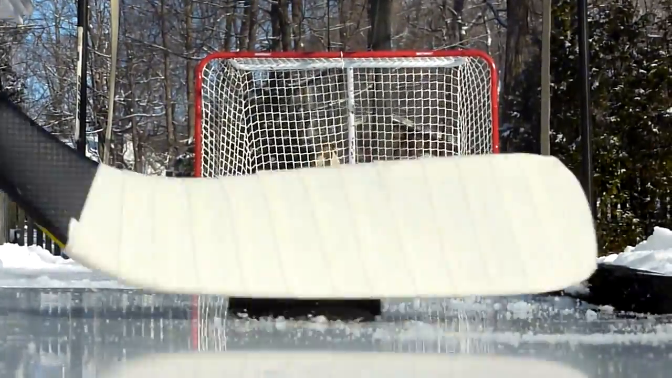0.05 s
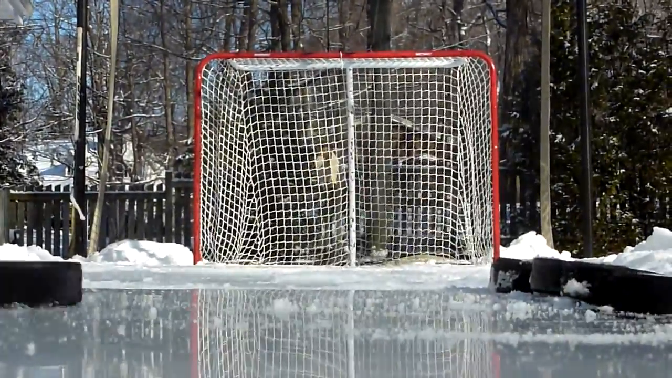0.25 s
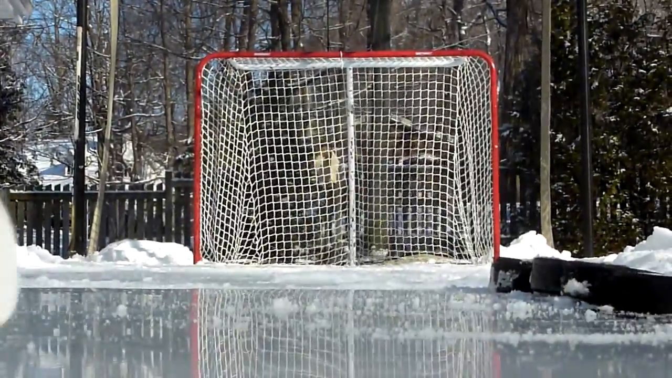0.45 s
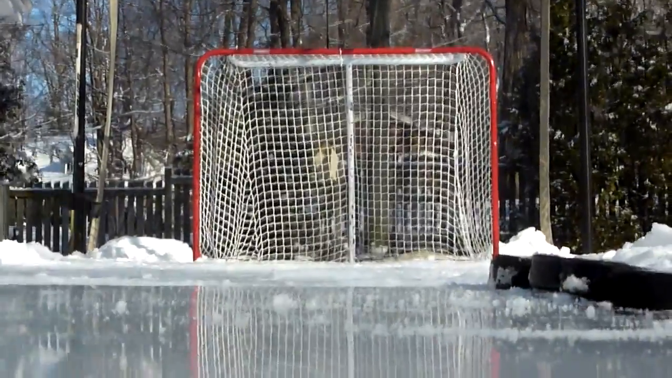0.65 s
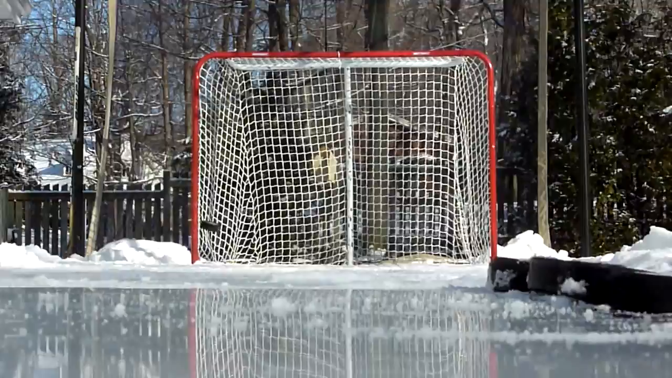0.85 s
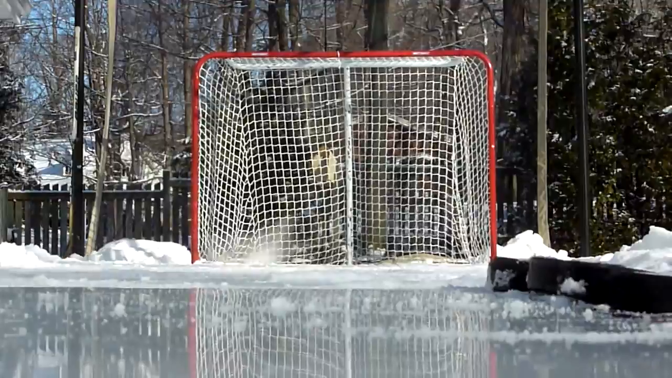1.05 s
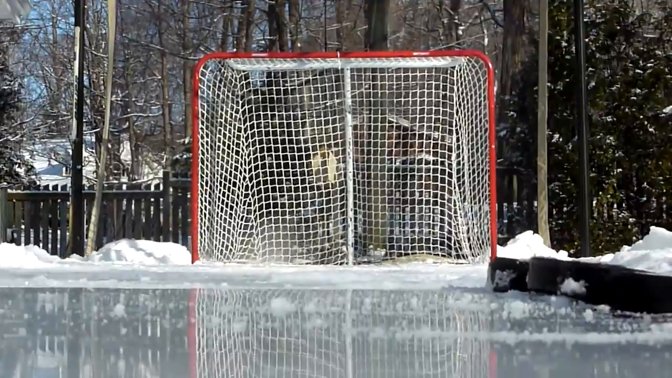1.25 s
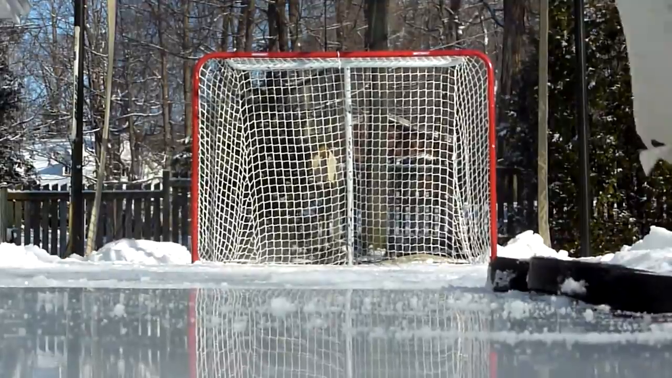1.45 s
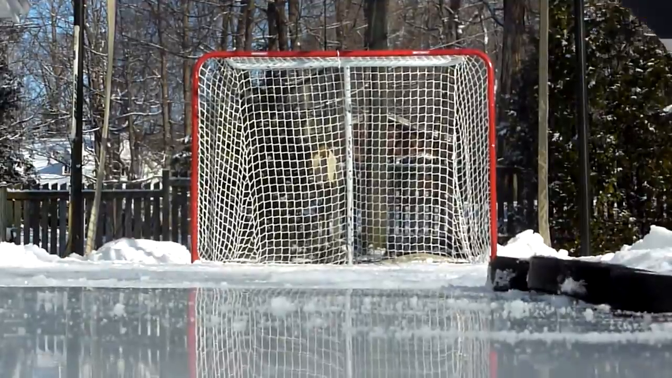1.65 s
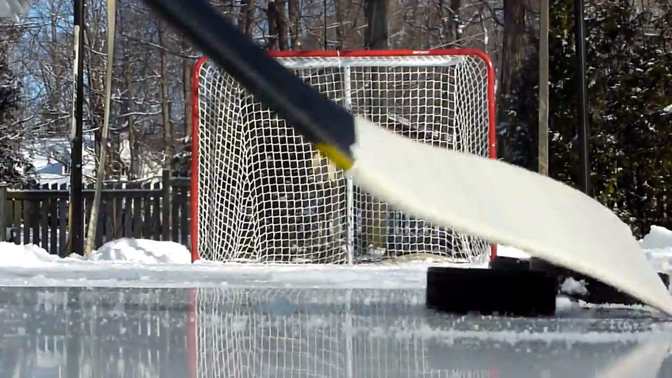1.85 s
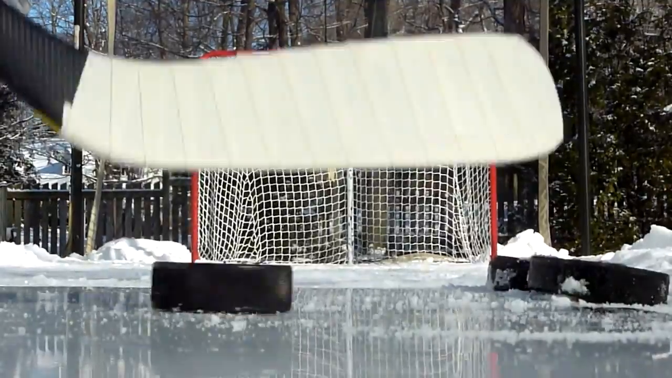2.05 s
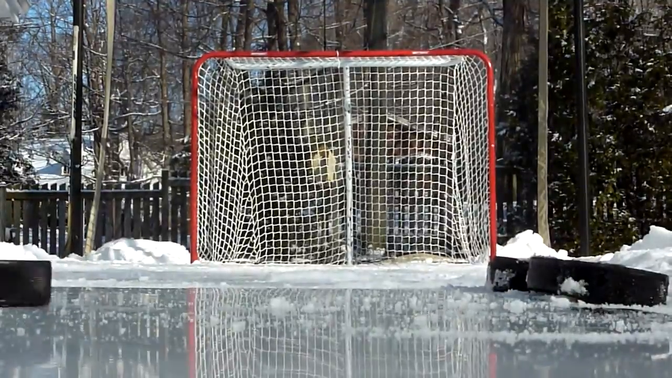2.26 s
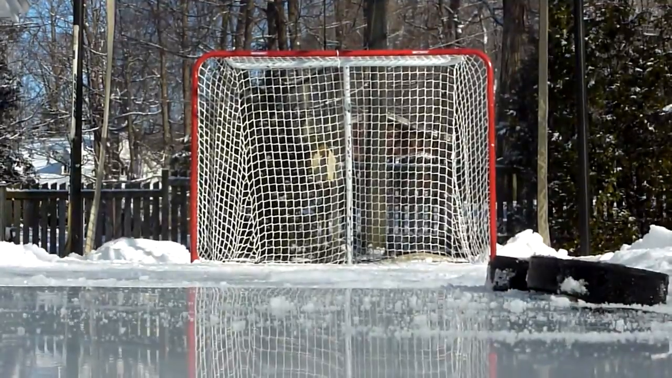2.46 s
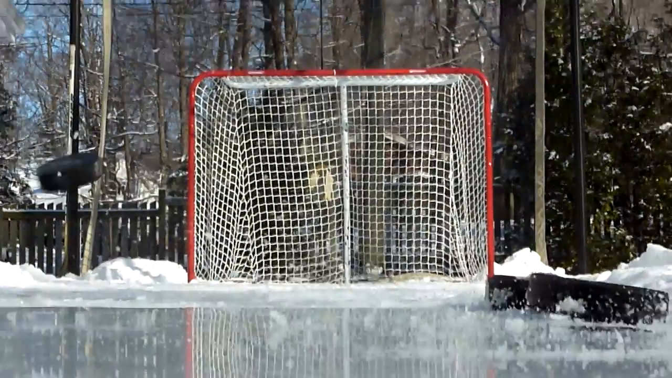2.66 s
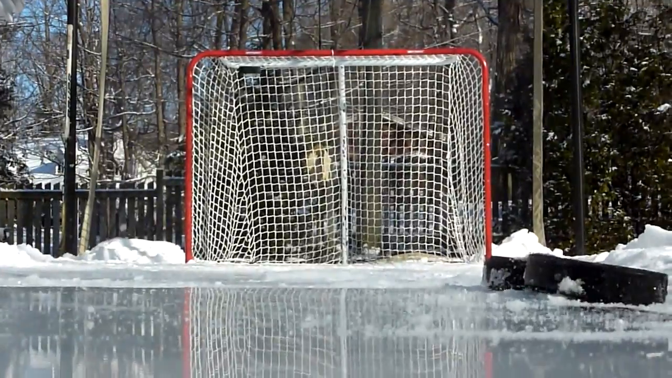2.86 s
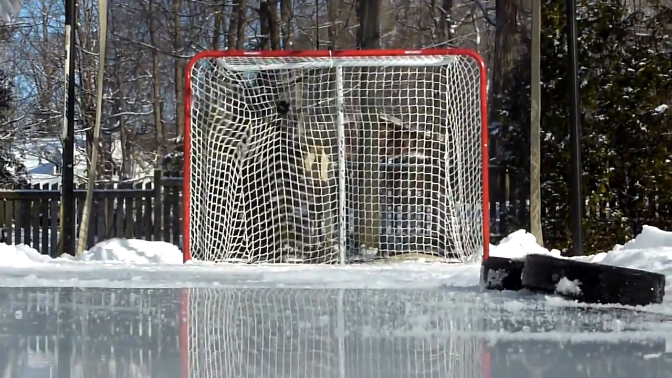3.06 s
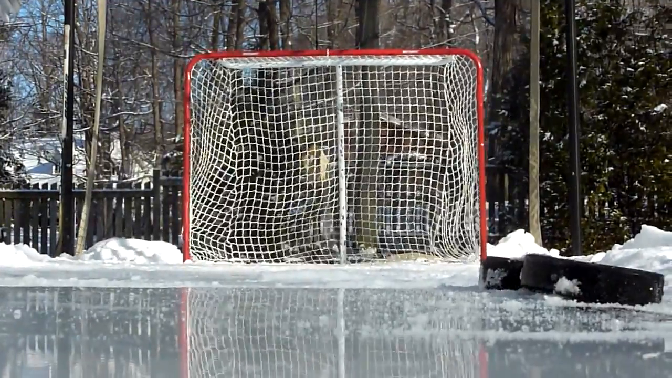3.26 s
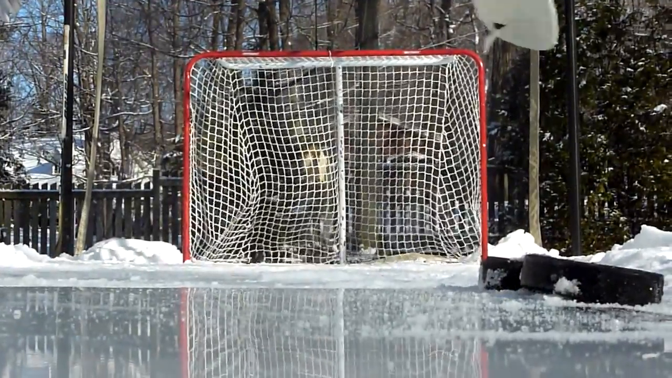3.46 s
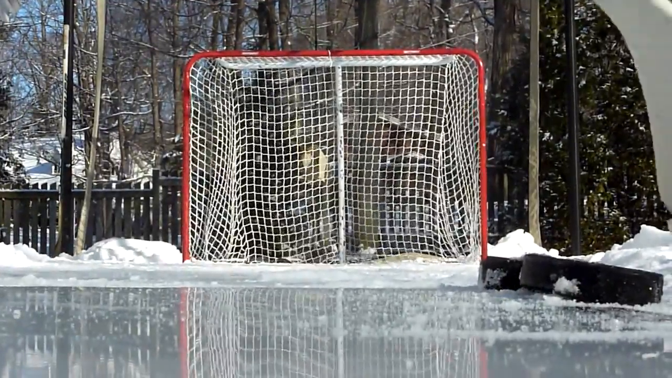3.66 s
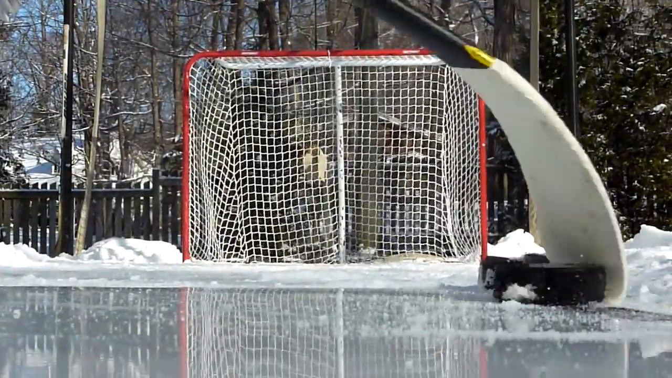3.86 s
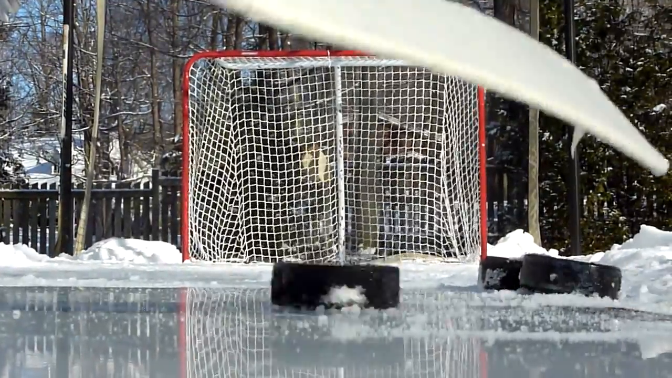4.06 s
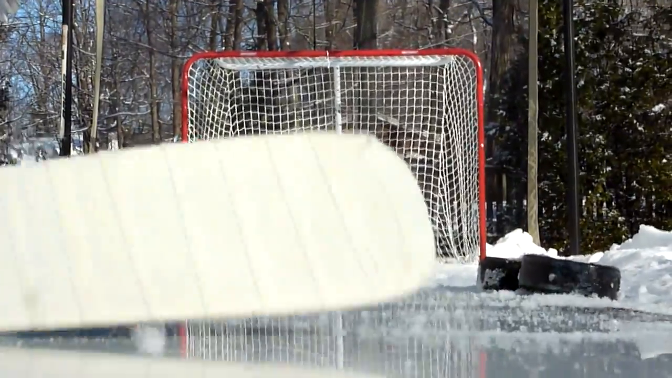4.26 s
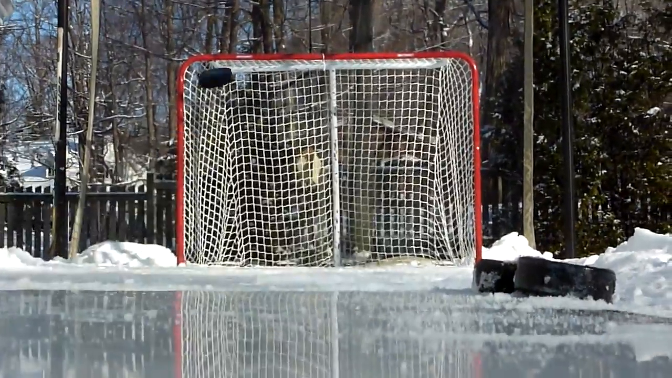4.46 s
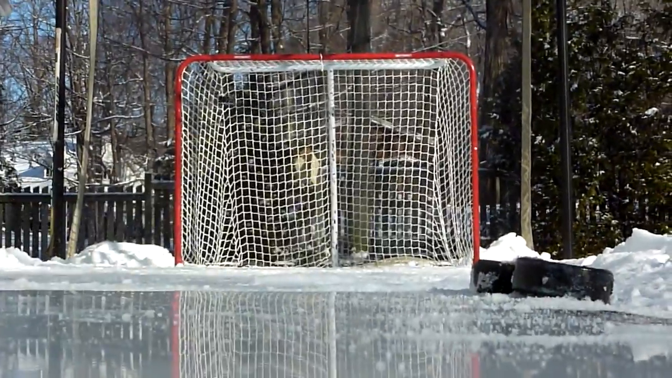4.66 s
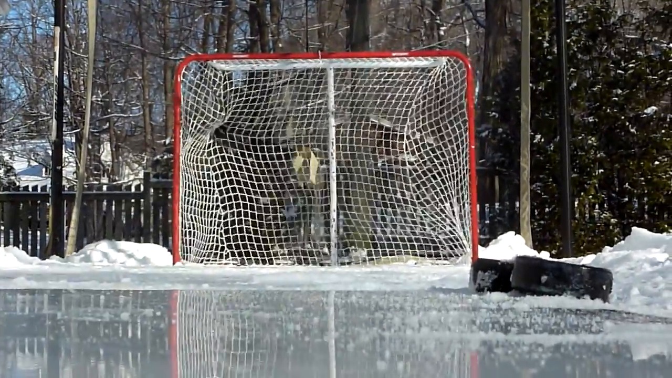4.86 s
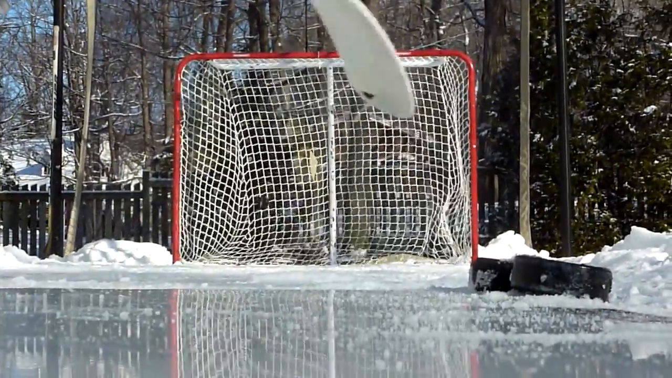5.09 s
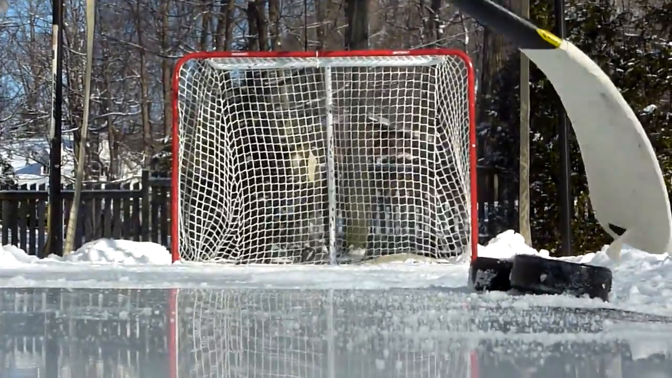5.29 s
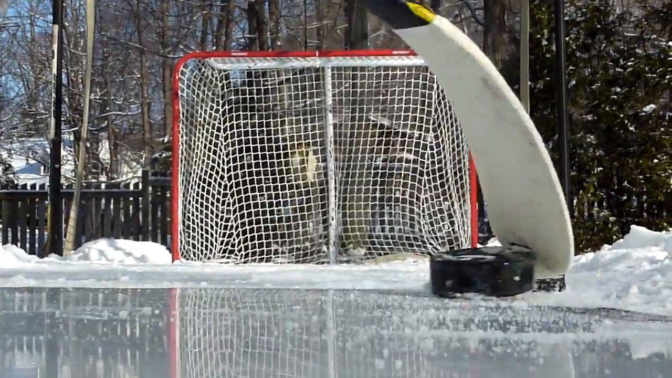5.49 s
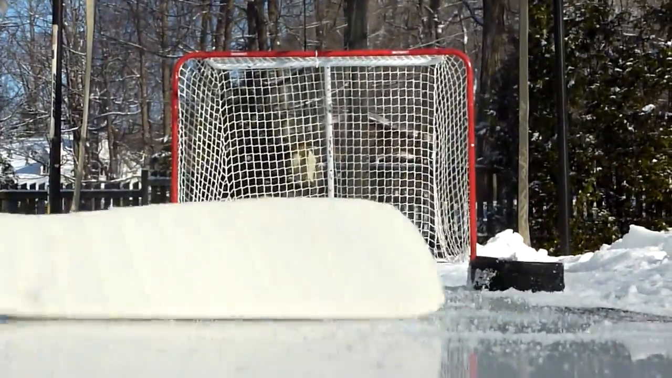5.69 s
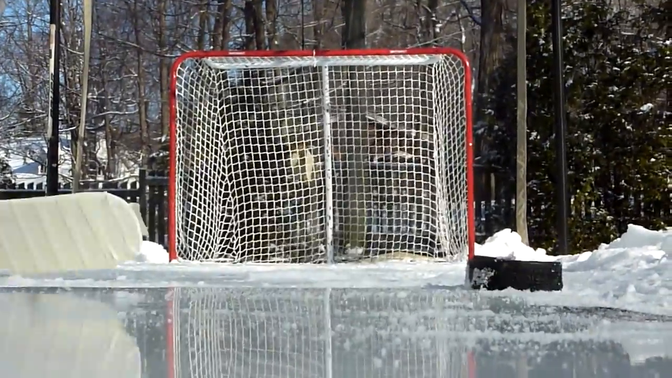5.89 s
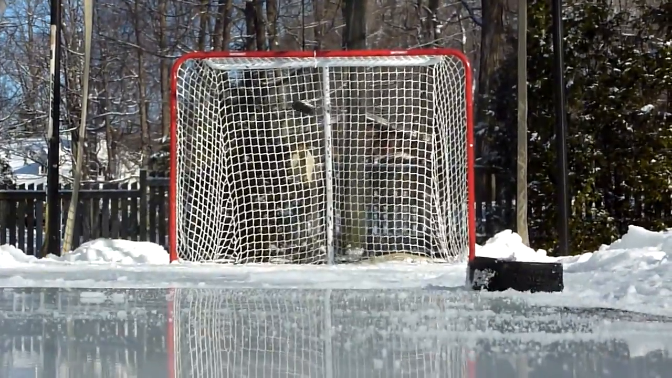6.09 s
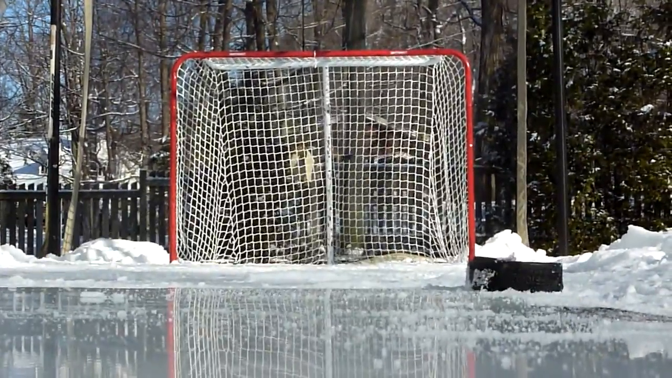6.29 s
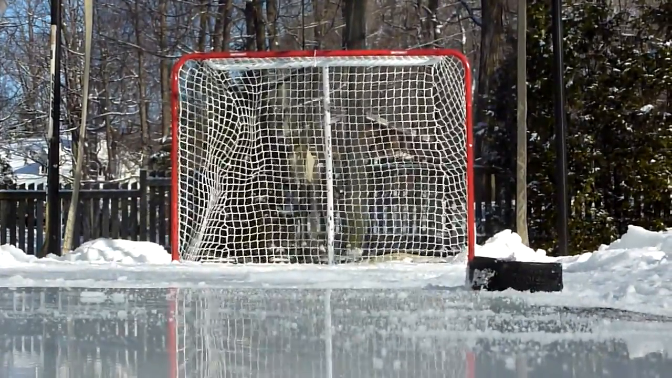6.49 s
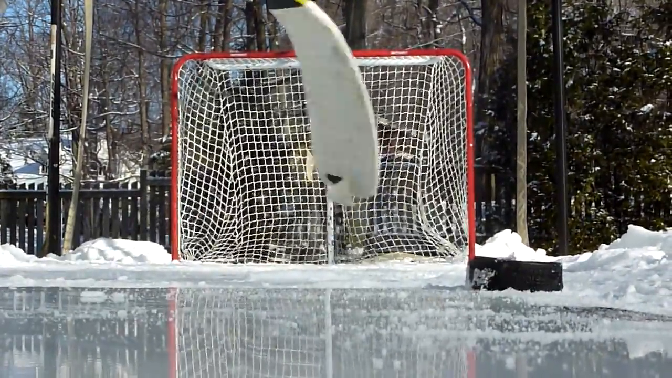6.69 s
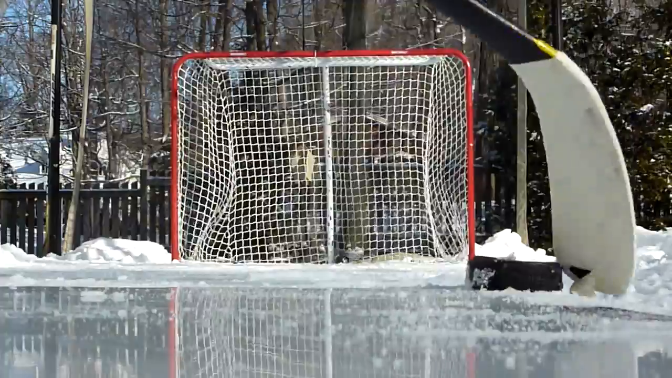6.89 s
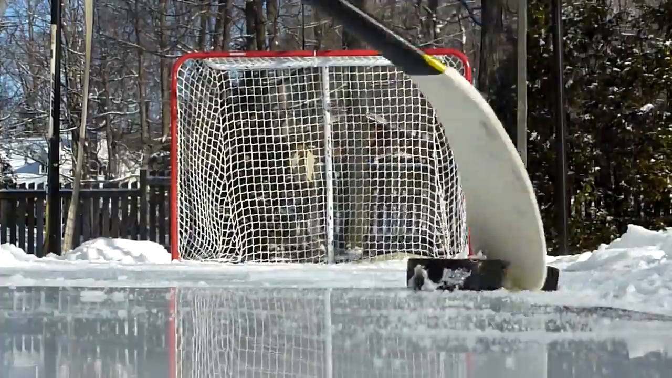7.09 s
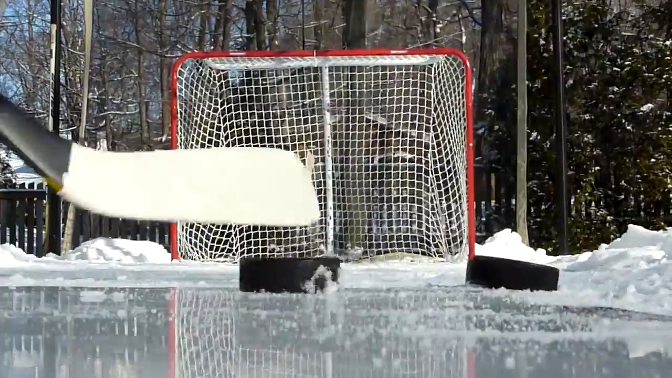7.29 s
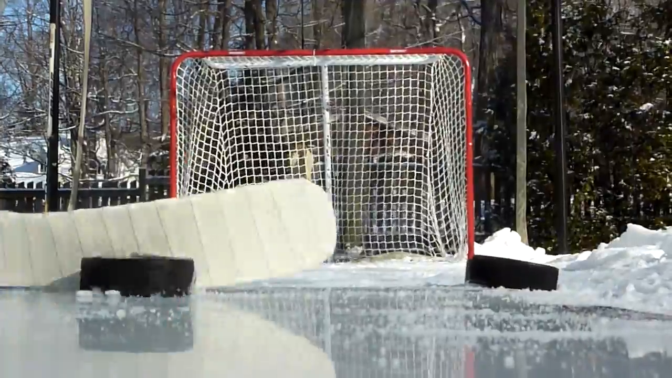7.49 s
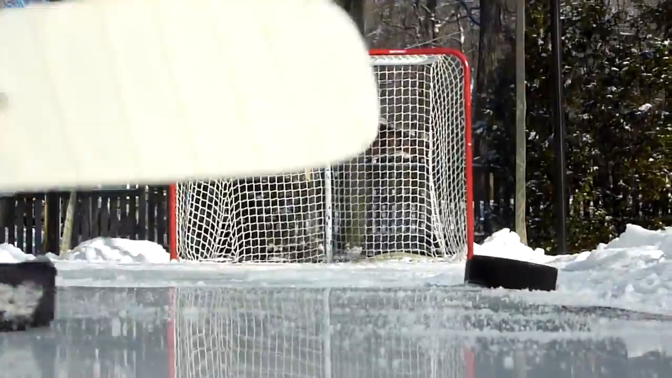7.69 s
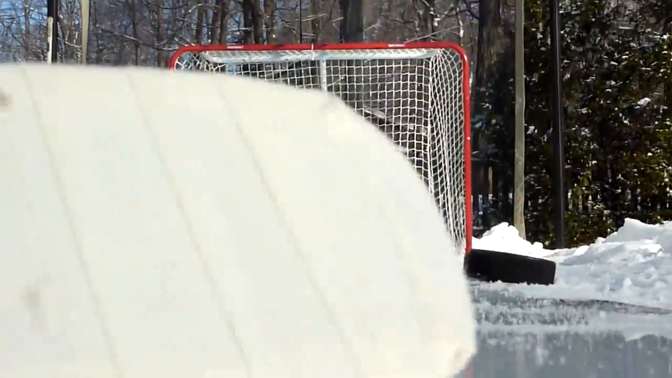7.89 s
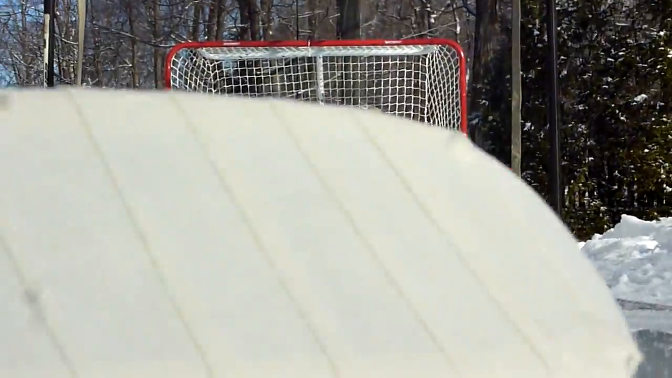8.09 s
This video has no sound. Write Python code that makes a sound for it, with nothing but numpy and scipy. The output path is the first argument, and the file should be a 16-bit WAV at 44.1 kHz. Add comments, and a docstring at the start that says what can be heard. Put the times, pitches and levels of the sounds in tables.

```python
"""An outdoor rink: a hockey stick drags pucks over the ice and shoots them at a net, heard from on the ice.
Far off a small engine idles as a row of harmonics in the hush of the yard, which is coloured noise.
Sliding blade and pucks hiss and rumble as noise; short rasps scuff and thin rings follow at the goal.
Each blow is a thump, ringing blade modes, a struck and rattling ice sheet and a burst of crack noise.
The steady sounds dip at listed moments and creep back."""
import sys
import numpy as np
from scipy import signal
from scipy.fft import rfft, irfft, next_fast_len
from scipy.io import wavfile
from scipy.ndimage import uniform_filter1d

SR = 44100
rng = np.random.default_rng(int(sys.argv[2]) if len(sys.argv) > 2 else 0)


def dump_mix(stems):
    """Bounce the given channels to the path in sys.argv[1] as a 16-bit WAV at rate SR."""
    frames = np.atleast_2d(stems).T  # one column per channel
    limited = np.clip(frames, -1, 1)  # hard clip at full scale
    pcm = np.round(limited * 32767).astype(np.int16)
    wavfile.write(sys.argv[1], SR, pcm)


N = 358974
T = np.arange(N) / SR  # time [s]

# colour of blade and puck scraping on ice: (frequency [Hz], relative density [dB per Hz])
SCRAPE = [(530, -30), (900, 1.5), (1850, -2), (2830, -7.5), (3190, -5), (3470, -5), (4520, -6), (5890, -7),
          (7490, -9), (8050, -11.5), (12700, -5.5), (15100, -20), (16000, -10.5)]
# modes of the blade ringing free: (frequency [Hz], relative level [dB], t60 [s])
BLADE = [(713, -4.5, 0.014), (953, -5, 0.01), (1295, -6, .011), (1626, -5.5, .009), (2086, -6, 0.01),
         (2697, -10.5, 0.0098), (3880, -11.5, 0.0098)]
HUSH_DIP_SHARE = 0.62  # hiss, rumble and yard dip less than the engine
CHATTER_TOP_HZ = 2300


def undb(db):
    """Decibels to amplitude."""
    return np.exp(np.asarray(db) * np.log(10) / 20)


def unit(x):
    """Scale to rms 1."""
    return x / np.sqrt(np.mean(x ** 2))


def fade(t, t60):
    """Exponential decay that loses 60 dB in t60 seconds."""
    return np.exp(-np.log(1000) * t / t60)


def lowpass(x, hz, order=2):
    """Butterworth low-pass."""
    return signal.sosfilt(signal.butter(order, hz, fs=SR, output="sos"), x)


def highpass(x, hz):
    """Second-order Butterworth high-pass."""
    return signal.sosfilt(signal.butter(2, hz, "high", fs=SR, output="sos"), x)


def resonate(x, hz, q):
    """One resonant mode driven by x."""
    return signal.lfilter(*signal.iirpeak(hz, q, SR), x)


def colour(x, table):
    """Filter by (frequency [Hz], level [dB]) points joined on a log axis."""
    hz, db = np.transpose(table)
    size = next_fast_len(N)
    f = np.arange(size // 2 + 1) * SR / size + 1
    gain = undb(np.interp(np.log(f), np.log(hz), db))
    return irfft(rfft(x, size) * gain, size)[..., :N]


def wide(x, table, alike):
    """Stereo noise of one colour, mid rms 1; a share of the side is the mid a quarter turn late, the rest unrelated."""
    # stereo width: (frequency [Hz], side minus mid [dB])
    side_width = [(60, -32), (110, -51), (200, -20), (380, -18), (700, -19), (1290, -8), (2380, -4),
                  (4400, -1.5), (8120, 0), (15000, 3)]
    mid, other = colour(x, table)
    late = np.imag(signal.hilbert(mid, next_fast_len(N)))[:N]
    late = highpass(late, 2500)  # only short waves turn
    side = colour(alike * late + np.sqrt(1 - alike ** 2) * other, side_width)
    return np.array([mid + side, mid - side]) / np.sqrt(np.mean(mid ** 2))


def walk(rate):
    """Random levels, rate per second, joined by straight glides; rms 1."""
    k = int(SR / rate)
    steps = np.repeat(rng.standard_normal(N // k + 1), k)
    return unit(uniform_filter1d(steps, k)[:N])


def dip_db():
    """Each dip sinks within a moment, comes most of the way back soon and creeps up the rest."""
    # dips of the steady sounds: (time [s], depth before recovery sets in [dB])
    dips = [(0.62, 31), (1.14, 10.5), (2.06, 11.5), (2.655, 41.5), (4.36, 37.5), (5.63, 4.5), (5.85, 7.5),
            (7.47, 9.5), (7.82, 16.5)]
    fall_s, back_s, creep_s, creep_share = 0.054, 0.14, 0.85, 0.15  # time constants
    out, coarse = 0, T[::64]
    for s, depth_db in dips:
        t = np.maximum(coarse - s, 0)
        back = (1 - creep_share) * np.exp(-t / back_s) + creep_share * np.exp(-t / creep_s)
        out = out - depth_db * (1 - np.exp(-t / fall_s)) * back
    return np.interp(T, coarse, out)


def hush():
    """Open air of the yard: coloured stereo noise whose level wavers and dips."""
    # colour of the yard: (frequency [Hz], relative density [dB per Hz])
    air = [(25, -15), (50, -15), (130, 8), (300, -8.5), (500, -4), (1000, -7), (2000, -14), (4000, -15.5),
           (8000, -21.5), (12000, -25.5), (16000, -33)]
    level_db = -40.5 + 0.61 * walk(6.3) + HUSH_DIP_SHARE * dip_db()
    return wide(rng.standard_normal((2, N)), air, 0.13) * undb(level_db)


def engine():
    """Harmonics of the firing rate on a slightly uneven crank pass the fixed exhaust colour."""
    # idling: (time [s], firing rate [Hz], level before dips [dB])
    idle = [(0.0, 26.7, -36), (0.32, 26.7, -33.5), (0.72, 27.93, -35.5), (1.09, 27.18, -34),
            (1.54, 27.6, -33.5), (2.2, 27.44, -32), (2.56, 27.5, -33.5), (3.02, 28.32, -33),
            (3.67, 27.57, -33), (3.97, 25.96, -29.5), (4.19, 26.66, -32.5), (4.49, 29.34, -35.5),
            (5.5, 29.07, -34.5), (5.73, 29.83, -33.5), (6.21, 29.4, -33.5), (7.25, 30.1, -33.5),
            (7.46, 29.52, -32), (8.14, 30.7, -36.5)]
    # exhaust colour: (frequency [Hz], relative level [dB])
    exhaust = [(28, -34), (55, -4.5), (82, -2.5), (88, -14), (109, 5), (150, 4), (165, 3.5), (180, -1),
               (200, -12.5), (220, -11), (250, -5.5), (275, -18.5), (300, -24), (360, -40)]
    s, rates, levels = np.transpose(idle)
    hz, level_db = np.interp(T, s, rates), np.interp(T, s, levels)
    turn = 2 * np.pi * np.cumsum(hz * (1 + 0.0039 * walk(25.2))) / SR
    pipe_hz, pipe_db = np.transpose(exhaust)
    hum = 0
    for k in range(1, 14):
        gain = undb(np.interp(k * hz, pipe_hz, pipe_db) + 1.8 * walk(4))
        hum = hum + gain * np.cos(k * turn + 0.042 * k * k)
    return unit(hum) * undb(level_db + dip_db())


def pings():
    """Thin rings as a puck reaches the goal: one narrow mode each, shaken by noise and fading."""
    # rings: (time [s], level at the start [dB], frequency [Hz], width [Hz], t60 [s])
    goal_rings = [(1.144, -27, 1950, 120, .12), (3.17, -43, 11800, 35, 0.33), (3.3, -50, 11800, 35, .28),
                  (5.011, -42, 11800, 35, 0.24), (6.7, -54, 11800, 35, 0.29)]
    out = np.zeros(N)
    for s, db, hz, width, t60 in goal_rings:
        at, t = int(s * SR), T[:int(t60 * SR)]
        ring = unit(resonate(rng.standard_normal(SR), hz, hz / width)[SR // 2:])
        out[at:at + len(t)] += undb(db) * fade(t, t60) * ring[:len(t)]
    return out


def ice(force):
    """The ice sheet answers a force with its broad modes, alternating in sign."""
    # modes of the sheet: (frequency [Hz], width [Hz], relative level [dB])
    sheet = [(258, 47.6, -4.5), (313.3, 24.3, 1), (344, 33, -1.5), (381, 39.4, -3.5), (445, 47, -4.5),
             (605, 90, -6.5), (690, 115, -7.5), (966, 310, -17), (1370, 340, -21)]
    out = 0
    for k, (hz, width, db) in enumerate(sheet):
        out = out + (-1) ** k * undb(db) * resonate(force, hz, hz / width)
    return out


def shaken(envelope):
    """A rough force of this envelope on the sheet; the low modes answer most and ring on."""
    soft = lowpass(rng.standard_normal(N), 1300)
    return ice(soft * envelope) / np.std(ice(soft))


def throbs():
    """The sheet rings low as blade and puck settle: tones that swell within a cycle or two and die away."""
    # low rings: (time [s], relative peak [dB], frequency [Hz])
    low_rings = [(0.038, -21, 336), (0.064, -17, 420), (0.139, -18, 307), (0.545, -13, 299),
                 (0.563, -14, 318), (0.571, -13, 318), (0.59, -20, 340), (0.606, -16, 328),
                 (0.619, -16, 320), (0.634, -20, 400), (1.771, -26, 296), (1.812, -23, 323),
                 (1.855, -24, 345), (1.957, -19, 355), (2.086, -23, 315), (2.662, -17, 388),
                 (3.808, -24, 277), (3.939, -26, 452), (4.203, -14, 420), (4.214, -13, 340),
                 (4.229, -16, 330), (4.243, -20, 300), (4.341, -12, 423), (5.536, -28, 439),
                 (5.64, -19, 380), (5.655, -22, 330), (5.862, -17, 450), (5.888, -22, 330),
                 (5.958, -18, 444), (5.992, -20, 350), (6.04, -27, 312), (6.987, -22, 323), (7.0, -21, 330),
                 (7.056, -23, 328), (7.065, -19, 326), (7.18, -24, 331), (7.202, -22, 304),
                 (7.452, -13, 312), (7.476, -15, 330), (7.492, -19, 360), (7.513, -17, 420),
                 (7.527, -20, 340), (7.551, -15, 430), (7.571, -18, 300), (7.653, -22, 342),
                 (7.69, -16, 342), (7.817, -16, 400), (7.841, -18, 401), (7.882, -19, 328)]
    rise_s, t60_s, trim_db = .004, .065, -3.5
    out, t = np.zeros(N + SR), T[:SR // 8]
    shape = (1 - np.exp(-t / rise_s)) * fade(t, t60_s)
    shape = shape / shape.max()
    for s, db, hz in low_rings:
        at = int(s * SR)
        out[at:at + len(t)] += undb(db + trim_db) * shape * np.sin(2 * np.pi * hz * t)
    return out[:N]


def grains():
    """Ice grains: dense noise of very uneven size, in gusts."""
    size_db = 2.2 * rng.exponential(size=N)
    return rng.standard_normal((2, N)) * undb(size_db + 3.4 * walk(200))


def chatter():
    """Sparse uneven ticks ring the blade's modes; rms 1."""
    ticks_per_s = 800
    chance = rng.random((2, N))
    size = (1 - chance[1]) ** -.2  # a few ticks are far larger
    ticks = (chance[0] < ticks_per_s / SR) * size * np.sign(rng.standard_normal(N))
    out = 0
    for hz, db, t60 in BLADE:
        out = out + undb(db) * resonate(ticks, hz, hz * t60 / 2.3) * hz ** -0.3
    return unit(lowpass(out, CHATTER_TOP_HZ, 4))


def swell_db(s, hold):
    """A stroke swells over a share of its length, stops steeply and rings on in the yard; returns span and dB."""
    rise_share, start_db, fall_db_per_s = 0.28, -11.5, 450
    tail_db, tail_db_per_s = -18, 94
    at = slice(max(int((s - .1) * SR), 0), int((s + hold + .3) * SR))
    left = s + hold - T[at]  # negative once the stroke is over
    rise = start_db * (1 - (T[at] - s) / (rise_share * hold))
    fall = np.maximum(fall_db_per_s * left, tail_db + tail_db_per_s * left)
    return at, np.minimum(np.minimum(rise, fall), 0)


def slide():
    """Blade and puck catch on ice grains: a broad hiss, a narrow high glide, a rumbling sheet, a chattering blade."""
    # strokes of sliding contact: (start [s], length [s], hiss [dB], brightness: top minus hiss [dB],
    # puck glide [dB], relative rumble in the ice [dB])
    strokes = [(-0.01, 0.048, -42, -10, -41.5, -30.5), (0.057, 0.021, -54, 1, -52, -21.5),
               (0.095, 0.049, -50, 0, -40.5, -29.5), (0.134, 0.35, -53, 2, -47.5, -44),
               (0.535, .04, -36, -3, -41, -30), (0.562, .024, -55, -10, -60, -19),
               (0.615, .03, -60, -10, -65, -24), (0.649, 0.037, -40.5, -14, -62, -33),
               (0.693, 0.081, -55, -18, -77, -46), (1.146, 0.016, -26.5, -25, -47, -32.5),
               (1.172, 0.069, -37.5, -1, -48, -54), (1.22, 0.12, -42, -9, -57, -55),
               (1.2, 0.51, -52, -4, -60, -50), (1.696, 0.05, -52, -2, -53, -41),
               (1.761, .14, -41, -6, -41, -30.5), (1.906, 0.17, -45, -7, -43, -29.5),
               (2.068, 0.14, -43, -11, -52, -33.5), (2.119, 0.57, -46, -11, -51, -42),
               (2.655, 0.011, -31, 5.5, -32, -24), (2.684, 0.031, -40.5, -16, -58, -33),
               (3.159, 0.062, -38.5, -3, -51, -40), (3.27, .05, -47.5, 6, -61, -43.5),
               (3.25, 0.61, -51, -3, -58, -46.5), (3.79, 0.026, -36, -13, -60, -37),
               (3.843, .06, -40, -12, -44, -35), (3.92, 0.06, -38, -8, -38.5, -31.5),
               (3.978, 0.22, -43.5, -14, -48.5, -42), (4.196, 0.047, -46, -3, -43.5, -26.5),
               (4.239, 0.084, -51, 0, -47, -48), (4.34, 0.041, -40, -8, -48, -28),
               (4.378, .06, -48.5, -12, -62, -39), (4.871, 0.095, -45.5, 3, -51, -50),
               (5, 0.032, -46, 7, -61, -57), (5.204, .06, -49, -20, -75, -42),
               (5.452, 0.041, -37.5, 0, -55, -46), (5.492, 0.036, -37, -12, -39.5, -31),
               (5.526, 0.013, -50, 0, -34, -50), (5.53, 0.05, -43, -3, -46, -36.5),
               (5.569, .006, -50, 0, -32, -50), (5.595, .006, -48, 0, -31.5, -50),
               (5.61, 0.0033, -51, 0, -33.5, -50), (5.593, 0.048, -40, -11, -45, -25),
               (5.637, .2, -46, 3, -39, -41), (5.858, 0.046, -53, 2, -49, -29),
               (5.9, 0.055, -53, 13, -37.5, -46), (5.936, 0.055, -43, 5, -45, -25.5),
               (5.99, 0.067, -44, -2, -54, -36), (6.066, 0.076, -39, 5, -46, -39),
               (6.0, 0.91, -75, -3, -80, -45), (6.473, .05, -40, -3, -48, -43),
               (6.52, 0.086, -46, 2, -49, -46), (6.626, 0.017, -29, 4, -55, -33),
               (6.981, .04, -66, -10, -66, -34), (7.048, 0.042, -60, -5, -66, -31),
               (7.11, .07, -60, 0, -53, -42), (7.155, 0.068, -46, -4, -50, -30),
               (7.214, .008, -50, 0, -45, -50), (7.22, 0.21, -50, -12, -52.5, -37),
               (7.25, .006, -45, -2, -42, -48), (7.287, .008, -52, 0, -46, -50),
               (7.327, 0.0071, -50, -3, -41.5, -50), (7.434, 0.036, -37, 0, -38, -27),
               (7.489, .09, -57, -7, -56, -28), (7.555, 0.25, -43, -3, -39, -39),
               (7.645, .075, -48, 7, -37.5, -25.5), (7.82, 0.078, -53, 0, -53, -33)]
    # between strokes, before dips: (hiss [dB], brightness [dB], glide [dB], relative rumble [dB])
    rest = (-62, -10, -71, -46.5)
    # colour of a gliding puck: (frequency [Hz], relative density [dB per Hz])
    glide_colour = [(5500, -13), (6600, -9.5), (7450, 4.5), (8000, 0.5), (8500, -2), (9500, -7.5),
                    (11000, -9.5), (13000, -62)]
    chatter_db, rumble_trim_db = -14, -2.5

    def gains(hiss, bright, glide, rumble):
        """Amplitudes of hiss, top, glide and rumble."""
        return undb([[hiss], [hiss + bright], [glide], [rumble]])

    level = gains(*rest) * undb(HUSH_DIP_SHARE * dip_db())
    for s, hold, *db in strokes:
        at, edge_db = swell_db(s, hold)
        level[:, at] = np.hypot(level[:, at], gains(*db) * undb(edge_db))
    hiss_level, top_level, glide_level, rumble_level = level
    grit = wide(grains(), SCRAPE, 0.36)
    top = highpass(grit, 7000)
    hiss = (grit - top) * hiss_level + top * top_level
    glide = wide(grains(), glide_colour, 0.17) * glide_level
    rumble = shaken(rumble_level * undb(rumble_trim_db + 2.5 * walk(40)))
    return hiss + glide + rumble + undb(chatter_db) * chatter() * rumble_level


def scuffs():
    """Short hard scuffs of the blade: a rasp starts at once, stops in milliseconds, broad around its own centre."""
    # scuffs: (time [s], length [s], level before the fade [dB], centre frequency [Hz])
    rasps = [(1.139, 0.024, -23.5, 7400), (1.703, 0.03, -25.5, 4600), (1.739, 0.023, -24, 5300),
             (1.806, 0.0092, -31.5, 4000), (1.848, 0.017, -26, 8900), (2.6562, .002, -7, 8300),
             (5.4937, .0012, -13, 3500), (6.9778, .001, -19, 4200), (6.9885, .0015, -27, 6500),
             (7.043, .004, -36, 7500), (7.8085, .002, -3, 2400), (7.8085, .0015, -12, 9000),
             (3.872, .025, -31, 5000), (5.429, 0.005, -28, 12500), (5.473, 0.017, -34, 3700),
             (5.951, 0.015, -35, 5140), (6.631, 0.016, -29, 4050), (6.648, 0.028, -41, 3000),
             (5.601, .012, -43, 13050), (4.898, 0.0093, -38, 13000), (7.166, 0.018, -34.5, 6000)]
    out, grit = np.zeros((2, N)), wide(grains(), SCRAPE, 0.76)
    for s, length, db, hz in rasps:
        at = slice(int(s * SR), int((s + length + 0.055) * SR))
        rasp = resonate(resonate(grit[:, at], hz, 1.2), hz, 1.2)
        over = np.maximum(T[at] - s - length, 0)
        out[:, at] += undb(db) * unit(rasp) * np.exp(-over / min(.004, length / 2))
    return out


def thump(cycles):
    """About two cycles of a low swing under a lopsided bell, its peak at 0."""
    bell = np.exp(-(cycles / np.where(cycles < 0, .45, .75)) ** 2)
    return np.cos(2 * np.pi * cycles) * bell


def knock(t, hard):
    """The struck blade rings its modes; each blow lands elsewhere, so they change in share and pitch."""
    scatter_db, detune, boost_db = 1.5, .1, 2.5
    held_share = .55  # pressed on puck or ice it rings only this share of its free time
    soft_tilt_db = -7  # per octave: a soft contact knocks duller
    out = 0
    for (hz, db, t60), g, d in zip(BLADE, *rng.standard_normal((2, len(BLADE)))):
        tilt_db = (1 - hard) * soft_tilt_db * np.log2(hz / 1000)
        wave = np.sin(2 * np.pi * hz * (1 + detune * d) * t) * fade(t, held_share * t60)
        out = out + undb(boost_db + db + tilt_db + scatter_db * g) * wave
    return out


def blows():
    """Each blow: a thump, the blade's knock, the ice struck and rattling on, blade chatter, a burst of crack noise."""
    # blows of blade and puck: (time [s], thump peak [dB], thump frequency [Hz], relative ice ring [dB],
    # relative knock [dB], crack [dB], left minus right of the crack [dB])
    hits = [(0.061, 2.5, 750, -19, -13, -12.5, -4), (0.134, -20, 420, -22, -35, -55, 5),
            (0.1559, -16, 330, -31, -32, -50, 9), (0.543, 0, 475, -11, -17, -30, 2),
            (0.551, -16, 700, -25, -23, -45, 3), (0.559, -4, 1050, -20, -9, -34, 9),
            (0.566, -22, 600, -23, -22, -40, 6), (0.587, -15, 816, -32, -31, -45, 3),
            (0.6025, -2.5, 540, -11, -14, -22, 5), (0.611, -14, 800, -22, -19, -45, 3),
            (0.628, -21, 848, -28, -34, -45, 12), (0.637, -26, 537, -21.5, -39, -51, 0),
            (0.6499, -3, 1000, -39, -1, -2.5, 3), (0.6532, -6, 810, -30, -11.5, -18, 0),
            (0.667, -29, 800, -40, -25, -45, 2), (0.6909, -36, 441, -41, -27, -39, 3),
            (1.142, 4.5, 784, -41, -30, -37, 1), (1.215, -23, 810, -43, -35, -37, -5),
            (1.2902, -23.5, 406, -25, -33, -49, 1), (1.7054, -26, 648, -49, -51, -21.5, -14),
            (1.7623, -16.5, 1002, -23, -21, -19, -5), (1.8528, -28, 344, -30, -29, -20.5, -7),
            (1.9445, -16, 500, -30, -32, -50, 4), (1.95, -8, 416, -20, -32, -38, 4),
            (1.961, -15, 420, -24, -34, -50, 5), (2.0549, 3.5, 788, -17, 1, -10.5, 0),
            (2.658, 0, 590, -22, -6.5, -11, 4), (2.6715, -12, 500, -30, -25, -40, 2),
            (2.6768, -12, 1085, -19.5, -9, -8.5, 2), (2.7085, -20, 930, -41, -25, -40, -3),
            (2.726, -42, 562, -43, -32, -52, 5), (2.7405, -28, 744, -38, -43, -53, 6),
            (3.489, -42, 276, -40, -30, -50, -1), (3.5473, -30, 795, -36, -33, -43, 3),
            (3.8024, -18.5, 401, -21, -15, -29, -2.5), (3.8937, -27, 485, -32, -38, -24, -13),
            (3.902, -22, 958, -48, -35, -16, -6), (3.9321, -25, 450, -26, -24, -25, 1),
            (4.2, 2, 487, -11, -30, -44, 6), (4.21, -11, 500, -24, -24, -44, 3),
            (4.2258, -9, 1200, -20, -18, -26, 8), (4.3372, 4, 402, -18, -2, -1.5, 1.5),
            (4.343, -15, 800, -24, -15, -35, 3), (4.3593, -10, 816, -17, -23, -42, 2),
            (4.3646, -0.5, 980, -37, -4, -4, -1), (4.369, -19, 900, -38, -17, -26, 0),
            (4.3791, -19, 1102, -43, -28, -40, 4), (4.3946, -47, 350, -28, -36, -37, 10),
            (4.9306, -23, 741, -47, -46, -40, -1), (5.4341, -31, 416, -43, -48, -25.5, -5),
            (5.494, -33, 887, -31, -12, -16.5, 0), (5.622, -8, 1300, -13, -5, -22, 2.5),
            (5.627, -7, 580, -18, -24, -45, 2), (5.6335, -13, 540, -22, -30, -48, 2),
            (5.854, 0, 680, -12.5, -13, -25, 2), (5.963, -14, 613, -19, -31, -34, 10),
            (5.9889, -15, 519, -21, -45, -28, 10), (6.6291, -23, 708, -28, -16.5, -26, -1.5),
            (6.9777, -25, 900, -22, -23, -30, -1), (6.9915, -18.5, 634, -23, -25, -45, 7),
            (7.0453, -28, 700, -26, -29, -45, 2), (7.066, -26, 400, -24, -40, -55, 1),
            (7.172, -27, 800, -24, -27, -32, 1), (7.1785, -23, 595, -21, -23, -25, 1),
            (7.185, -21, 560, -24, -25, -34, 1), (7.4449, 1, 480, -7.5, -2, -11, 3),
            (7.4502, -12, 900, -18, -12, -35, 3), (7.455, -18, 603, -20, -21, -40, 3),
            (7.471, -21, 604, -14.5, -27, -40, 8), (7.4864, -18, 846, -22, -28, -39, 13),
            (7.5469, 1, 900, -11.5, -23, -17.5, -5), (7.5767, -19, 283, -23, -32, -36, 9),
            (7.6842, -11, 400, -19, -28, -40, -1), (7.8087, 1, 2300, -40, -20, -12, 0),
            (7.8095, 3, 400, -16, -12, -9, 0), (7.8128, -7, 480, -26, -14, -22, 0),
            (7.836, -27, 848, -24, -28, -56, 9), (7.849, -36, 668, -33, -28, -54, 10),
            (7.87, -7, 720, -28, -30, -52, -1), (7.881, -22, 333, -22, -40, -49, 2),
            (7.9158, -33, 410, -31, -27, -56, 3), (7.9981, -60, 278, -42, -39, -52, 4),
            (8.063, -44, 611, -48, -32.5, -55, 4), (8.1009, -33, 322, -33, -37, -51, 4)]
    # colour of the crack: (frequency [Hz], relative density [dB per Hz])
    crack_colour = [(1180, -10), (2000, -1), (2880, -3.5), (3940, 1), (4690, -1), (6470, -4), (8480, 0.5),
                    (10200, -9.5), (14300, -17), (16000, -27)]
    strike_db, rattle_db = 33, -6  # how a blow divides between clean ring and rattle
    rattle_t60_s, rattle_rise_s = 0.08, 0.00075
    chatter_db, chatter_t60_s = -9, .06
    dull_hz, low_cut_hz = 4000, 110  # top of a soft contact's crack; floor of thump and knock
    strike, rattle, shake = np.zeros((3, N + SR))
    body, hard_crack, soft_crack = np.zeros((3, 2, N + SR))
    t, short, lead = T[:SR // 8], T[:SR // 40], SR // 200
    for s, peak_db, hz, ring_db, knock_db, crack_db, pan_db in hits:
        at, pan = int(s * SR), undb(np.array([[pan_db], [-pan_db]]) / 2)
        early = at - int(.15 * SR / hz)  # knock and crack come just ahead of the swing
        long_span, ring = slice(at, at + len(t)), undb(ring_db)
        hard = np.clip((crack_db - peak_db + 32.0) / 18, 0, 1)
        # long waves wrap round the housing, so the thump leans less than the crack
        swing = thump(hz * (short - lead / SR) - .25)
        body[:, at - lead:at - lead + len(short)] += undb(peak_db) * pan ** 0.099 * swing
        body[:, early:early + len(short)] -= undb(knock_db) * pan ** 1.3 * knock(short, hard)
        strike[at] += ring
        rattle[long_span] += ring * fade(t, rattle_t60_s) * (1 - np.exp(-t / rattle_rise_s))
        shake[long_span] += ring * undb(chatter_db) * fade(t, chatter_t60_s)
        # weaker cracks last slightly longer; a soft contact's crack is duller
        burst = undb(crack_db) * pan * fade(t, 0.01 - 0.00003 * crack_db)
        hard_crack[:, early:early + len(t)] += hard * burst
        soft_crack[:, early:early + len(t)] += (1 - hard) * burst
    sheet_ring = undb(strike_db) * ice(strike[:N]) + undb(rattle_db) * shaken(rattle[:N])
    sheet_ring = lowpass(sheet_ring, CHATTER_TOP_HZ)
    body = highpass(body, low_cut_hz)[:, :N]
    snap = wide(rng.standard_normal((2, N)), crack_colour, 0.59)
    dull = unit(lowpass(snap, dull_hz))
    crack = hard_crack[:, :N] * snap + soft_crack[:, :N] * dull
    return body + sheet_ring + shake[:N] * chatter() + crack


def scene():
    """All layers, from the far background to the blows."""
    return hush() + engine() + pings() + throbs() + slide() + scuffs() + blows()


def record(dry):
    """Left and right ports differ in tone, the housing cuts a narrow notch, peaks clip, the top is cut."""
    # tone of the ports: (frequency [Hz], left minus right [dB])
    port_lean = [(60, 1.5), (110, -1), (200, 0.3), (380, 0), (700, 0.2), (1290, 2.2), (2380, 1.6),
                 (4400, -0.5), (8120, 1), (15000, 1)]
    notch_hz, notch_width_hz, top_hz = 7890, 300, 15700
    lean = [[(hz, side * db / 2) for hz, db in port_lean] for side in (1, -1)]
    x = np.array([colour(channel, table) for channel, table in zip(dry, lean)])
    x = signal.lfilter(*signal.iirnotch(notch_hz, notch_hz / notch_width_hz, SR), x)
    clipped = np.clip(x, -.98, .98)
    return signal.sosfilt(signal.ellip(10, .2, 80, top_hz, fs=SR, output="sos"), clipped)


dry = scene()
out = record(dry)
dump_mix(out)
```